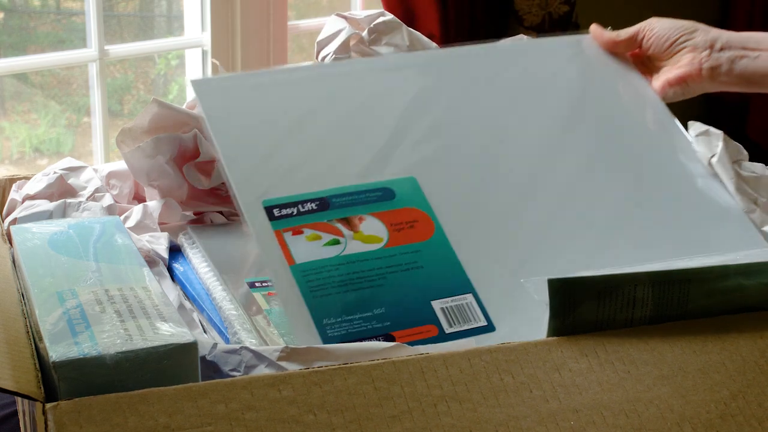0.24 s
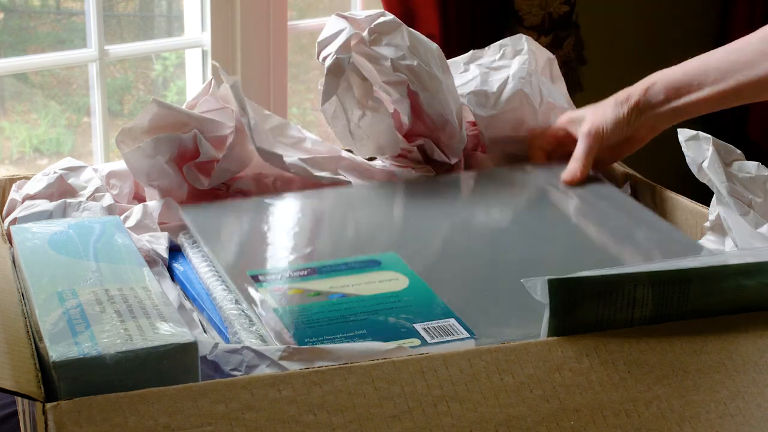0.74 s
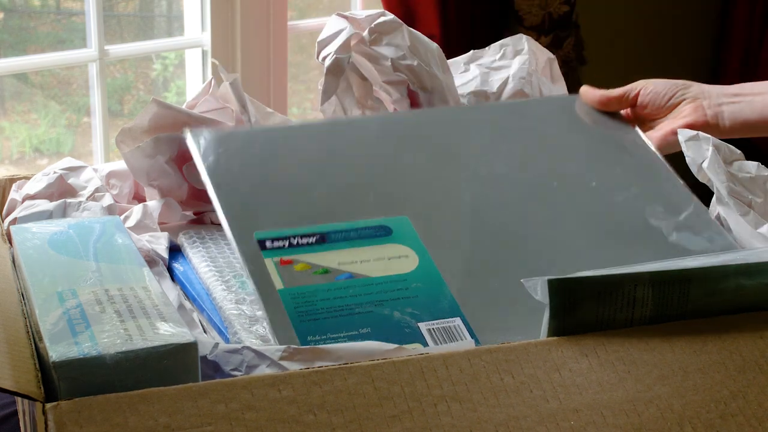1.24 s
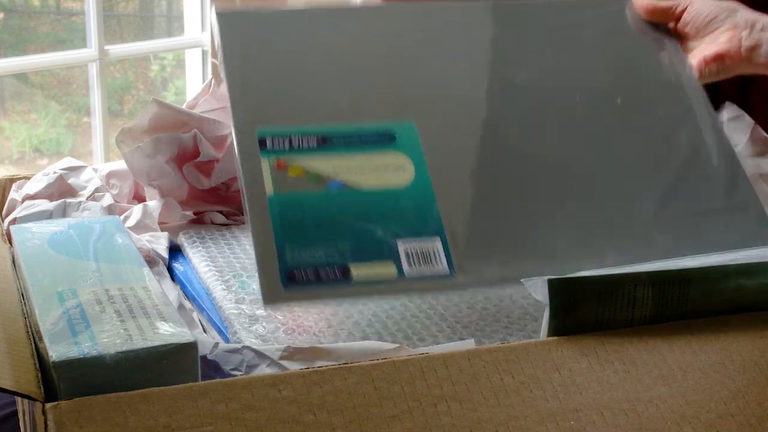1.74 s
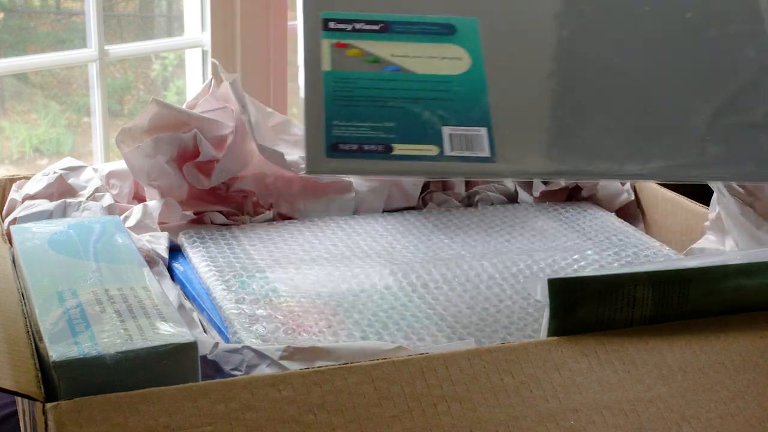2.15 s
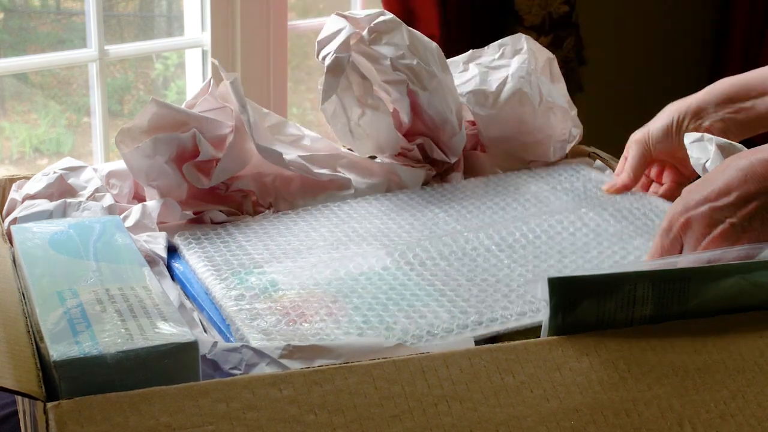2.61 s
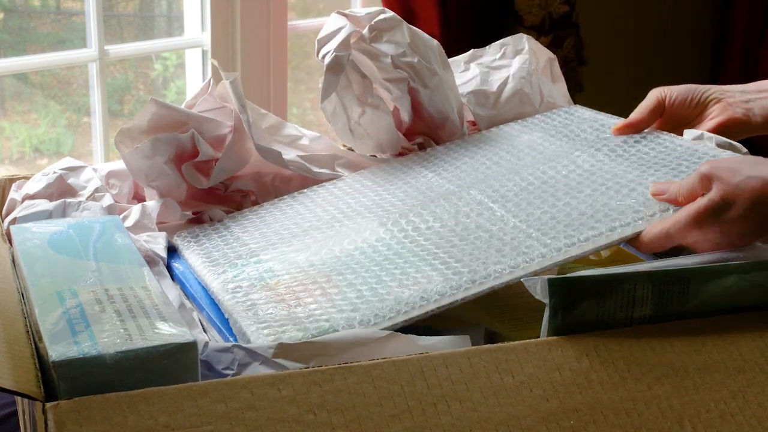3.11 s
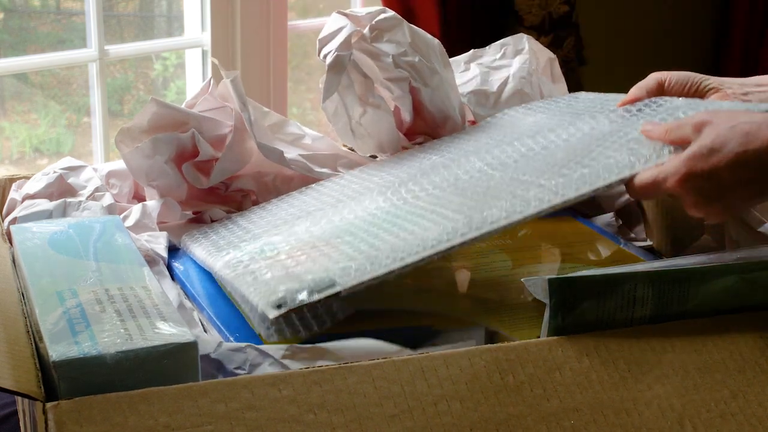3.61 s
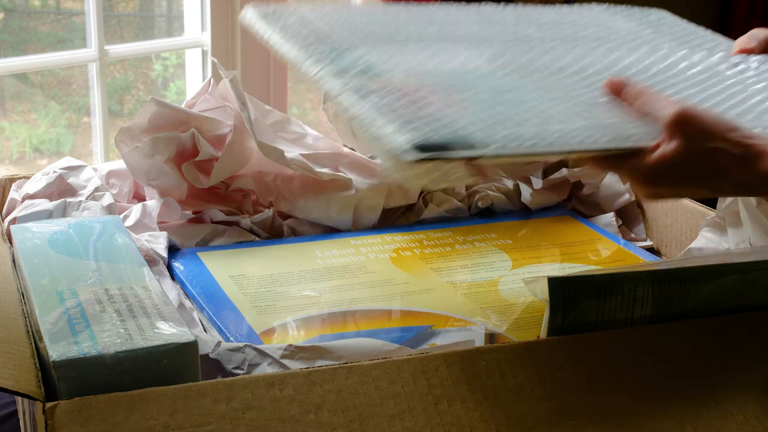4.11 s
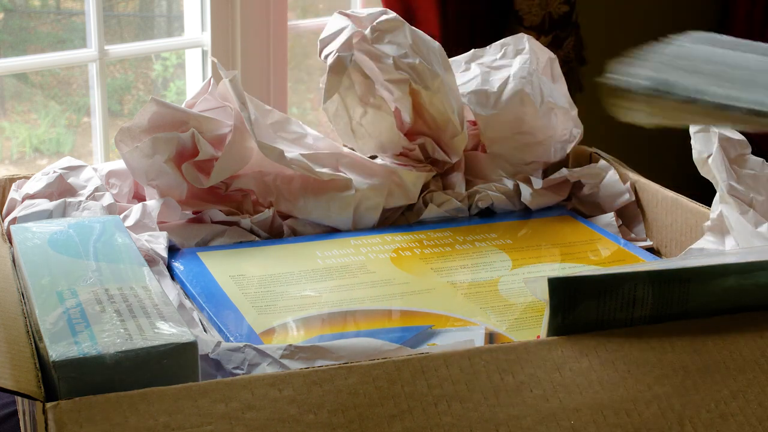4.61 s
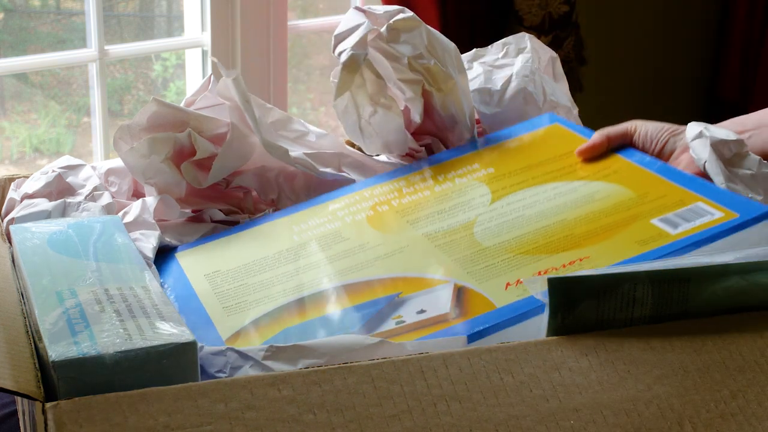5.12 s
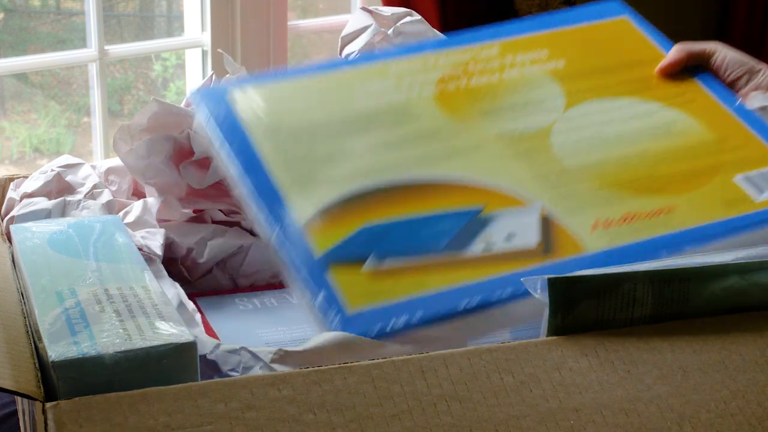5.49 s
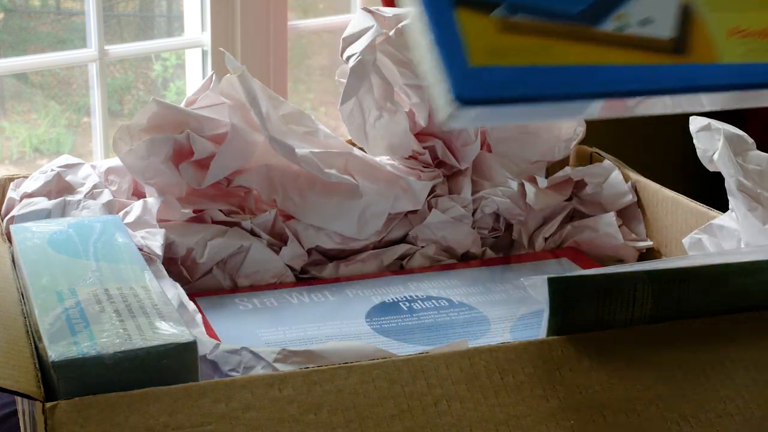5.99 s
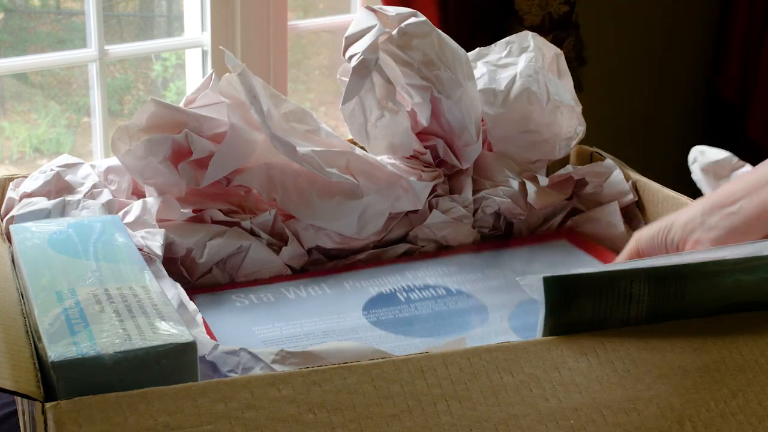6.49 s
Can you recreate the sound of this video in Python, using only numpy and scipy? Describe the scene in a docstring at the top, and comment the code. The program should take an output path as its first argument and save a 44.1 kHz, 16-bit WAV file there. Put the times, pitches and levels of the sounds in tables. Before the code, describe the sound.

Close, irregular bursts of crackling paper, hissing plastic and scraping cardboard as flat packages slide out of a box indoors, ending in a loud rummage.

```python
"""Hissing plastic, crackling paper, snapping creases and knocking edges in a cardboard box in a small room.
Plastic-wrapped boards, a bubble-wrapped sheet and a pad are pulled out past crumpled paper.
Rubbing is coloured noise under trains of tiny random slips; snaps are short ringing noise bursts;
drags are resonances driven by random slips; thumps are damped sines.
Box resonances, diffuse room echoes and a steady hush surround them in stereo."""
import sys
import numpy as np
from scipy import signal
from scipy.fft import rfft, irfft, next_fast_len
from scipy.io import wavfile

SR = 44100
rng = np.random.default_rng(int(sys.argv[2]) if len(sys.argv) > 2 else 0)


def dump_mix(stems):
    """Bounce the given channels to the path in sys.argv[1] as a 16-bit WAV at rate SR."""
    frames = np.atleast_2d(stems).T  # one column per channel
    limited = np.clip(frames, -1, 1)  # hard clip at full scale
    pcm = np.round(limited * 32767).astype(np.int16)
    wavfile.write(sys.argv[1], SR, pcm)


N = 297675
TIME = np.arange(N) / SR
PADDED = next_fast_len(N + SR, True)
FREQS = np.fft.rfftfreq(PADDED, 1 / SR)


def from_db(db):
    """Decibels to gain."""
    return 10 ** (np.asarray(db) / 20)


def rms_one(x):
    """Scale to rms 1."""
    return x / np.sqrt(np.mean(x ** 2) + 1e-20)


def at_hz(points, hz):
    """Read a table on a log-frequency axis."""
    f, value = np.transpose(points)
    return np.interp(np.log(np.maximum(hz, 1)), np.log(f), value)


def colour(x, spectrum):
    """Causal (minimum-phase) filter with the given dB curve."""
    cepstrum = irfft(np.log(from_db(at_hz(spectrum, FREQS))), PADDED)
    cepstrum[1:PADDED // 2] *= 2
    cepstrum[PADDED // 2 + 1:] = 0
    response = np.exp(rfft(cepstrum))
    return irfft(rfft(x, PADDED) * response, PADDED)[..., :N]


def band(x, low_hz, high_hz):
    """Butterworth band-pass."""
    sos = signal.butter(2, [low_hz, high_hz], "band", fs=SR, output="sos")
    return signal.sosfilt(sos, x)


def highpass(x, cutoff_hz):
    """Second-order Butterworth high-pass."""
    return signal.sosfilt(signal.butter(2, cutoff_hz, "high", fs=SR, output="sos"), x)


def boost_peak(x, hz, q, boost_db):
    """Raise or lower one resonance; boost_db may vary in time."""
    b, a = signal.iirpeak(hz, q, fs=SR)
    return x + (from_db(boost_db) - 1) * signal.lfilter(b, a, x)


def drift(per_s):
    """Slow random curve of rms 1, with per_s knots a second."""
    knots = rng.standard_normal(N // 10)
    return rms_one(np.interp(TIME * per_s, np.arange(len(knots)), knots))


def rummaging():
    """Cardboard, paper and plastic rub under the strokes of the hands."""
    card_gain, paper_gain, plastic_gain, sheen, glide = hands()
    # slips come in clumps, which even out in a fast glide
    clumps = from_db(3.0 * (1 - 0.83 * glide) * drift(90))
    return (from_db(-4.5) * card_gain * cardboard_rub(clumps)
            + from_db(-4.0) * paper_gain * paper_rustle(clumps)
            + from_db(0.1) * plastic_gain * plastic_hiss(clumps, sheen, glide))


def hands():
    """Strokes add in power: gains of cardboard, paper and plastic; sheen and glide are means by film power."""
    # hand strokes: first board, second board, bubble-wrapped sheet, pad, then the hand dives back in
    # start/s, swell/s, hold/s, fade/s, then before the mix trims: cardboard/dB, paper/dB, plastic/dB,
    # sheen/dB (top of hiss over its lower part), glide/1 (0 bent and crinkling, 1 flat and fast)
    strokes = [ (0.17, 0.072, .26, 0.077, -56.5, -52.5, -62.5, -2, 0.42),
               (0.36, 0.22, 0.021, 0.087, -60, -50.5, -50, 4.5, 0.79),
               (0.542, 0.05, 0.007, 0.066, -39, -38.5, -52, -14.5, .4),
               (0.71, .003, 0.13, 0.085, -45, -38.5, -39.5, 0, 0.98),
               (0.909, 0.016, 0.038, 0.14, -64, -47, -52, 0, 0.27),
               (1.197, 0.0066, .01, 0.072, -54.5, -58, -59, -12, 0.51),
               (1.305, 0.0046, 0.009, 0.33, -59.5, -59, -60, 7, .3),
               (1.42, 0.23, .14, .1, -60, -55, -57, 0, .3),
               (1.78, 0.053, 0.016, 0.089, -45.5, -50, -50, 2, .3),
               (2.376, 0.01, .08, 0.11, -58, -54.5, -56, 3, 0.27),
               (2.431, 0.079, 0.036, 0.11, -45.5, -41.5, -45.5, 1, .3),
               (2.58, 0.17, 0.028, 0.11, -46, -43, -39.5, 6, 0.49),
               (2.77, 0.031, 0.017, 0.24, -48, -40, -42, 0.5, 0.52),
               (2.85, 0.11, 0.39, 0.5, -68, -51.5, -47, 1, 0.091),
               (3.2, 0.031, 0.012, 0.049, -58, -49, -42.5, 6, .05),
               (3.42, 0.17, 0.01, 0.33, -45, -45, -43.5, -1, 0.2),
               (3.66, 0.17, 0.34, 0.24, -74, -58, -44, 5, 0.79),
               (3.97, 0.039, 0.11, .05, -66, -66, -45, 3.5, 1),
               (4.26, 0.027, 0.059, 0.13, -56.5, -51.5, -45, 0.5, .4),
               (4.42, 0.13, 0.097, 0.11, -82, -63, -52, 3, .05),
               (4.665, 0.025, 0.098, 0.11, -79, -55, -46.5, 0.5, .05),
               (4.993, 0.0059, .28, .1, -49, -47.5, -55.5, 1.5, 0.06),
               (5.25, 0.14, 0.032, 0.17, -40, -40, -42.5, -3.5, .1),
               (5.47, 0.12, 0.076, 0.14, -44.5, -45, -48.5, -0.5, 1),
               (5.68, 0.034, 0.036, 0.13, -48, -42.5, -51, -6, 0.45),
               (5.919, 0.0092, 0.013, 0.11, -55, -39, -48, -16, 0.83),
               (6.178, 0.0066, 0.0064, 0.072, -60, -46, -52.5, -10, 0.46),
               (6.548, 0.002, 0.17, .2, -34.5, -36, -41, -3, .35),
               (6.57, 0.049, 0.013, 0.046, -36, -26, -40, 3, .35)]
    # constant faint floor under the strokes: cardboard/dB, paper/dB, plastic/dB, sheen/dB, glide/1;
    # levels before the mix trims
    constant_floor = (-68.5, -73.5, -73.5, 7, -0.1)
    moves = [(0.99, *constant_floor)] + [(stroke(*row[:4]), *row[4:]) for row in strokes]
    card, paper, plastic, sheen_sum, glide_sum = np.full((5, N), 1e-18)
    for gain, card_db, paper_db, plastic_db, sheen_db, glide in moves:
        film = (gain * from_db(plastic_db)) ** 2
        card += (gain * from_db(card_db)) ** 2
        paper += (gain * from_db(paper_db)) ** 2
        plastic += film
        sheen_sum += film * sheen_db
        glide_sum += film * glide
    sheen = from_db(sheen_sum / plastic)
    return np.sqrt(card), np.sqrt(paper), np.sqrt(plastic), sheen, np.clip(glide_sum / plastic, 0, 1)


def stroke(start_s, swell_s, hold_s, fade_s):
    """Gain of one movement: it gathers speed, holds, then loses 20 dB per fade time."""
    t = TIME - start_s
    swell = np.clip(t / swell_s, 0, 1) ** 1.15
    return swell * from_db(-20 * np.clip((t - swell_s - hold_s) / fade_s, 0, 10))


def cardboard_rub(clumps):
    """Slow slips of board on cardboard, with drifting low resonances; rms 1."""
    # rubbed cardboard colour: f/Hz, relative density/dB
    cardboard = [(40, -43), (75, -31), (120, -8), (220, -2.5), (345, -0.5), (500, 6.5), (720, 1.5),
                 (950, -6), (2000, -32.5)]
    rub = friction(cardboard, slips_per_s=130, spread_db=1.0, slip_s=0.00585, smooth_db=5.0, clumps=clumps)
    return unevenly_coloured(rub, np.geomspace(190, 800, 7), patchy_db=4.0, per_s=21)


def paper_rustle(clumps):
    """Short, uneven slips of crumpled paper, with drifting resonances of its folds; rms 1."""
    # crumpled paper colour: f/Hz, relative density/dB
    paper = [(350, -27), (700, -18.5), (1000, -3), (1800, -2.5), (2700, -1.5), (3500, -13), (6000, -23),
             (12000, -57)]
    rustle = friction(paper, slips_per_s=260, spread_db=3.8, slip_s=.0014, smooth_db=-4, clumps=clumps)
    return unevenly_coloured(rustle, np.geomspace(900, 3300, 8), patchy_db=2.5, per_s=45)


def plastic_hiss(clumps, sheen, glide):
    """Dense tiny slips hiss in two ranges; bent film adds pops, gliding film a finer hiss."""
    # lower film hiss: f/Hz, relative density/dB
    plastic_low = [(1500, -26), (2800, -2.5), (3700, -0.5), (4500, 1), (6200, -2), (8000, -6.5),
                   (13000, -41)]
    # upper film hiss: f/Hz, relative density/dB
    plastic_top = [(4000, -33.5), (6500, -8.5), (8000, -0.5), (9800, 2.5), (11200, -2.5), (12500, -4.5),
                   (14500, -11.5), (16000, -21)]
    # finest hiss, film gliding on film: f/Hz, relative density/dB
    glide_hiss = [(7000, -25), (10500, -6.5), (12000, 1), (14500, -9), (16000, -11)]
    low = friction(plastic_low, slips_per_s=940, spread_db=0.0, slip_s=0.00065, smooth_db=5.5, clumps=clumps)
    top = friction(plastic_top, slips_per_s=990, spread_db=-0.5, slip_s=0.00073, smooth_db=-2.5, clumps=clumps)
    rubbing = (low + sheen * top) / np.sqrt(1 + sheen ** 2)
    popping = from_db(-5) * (1 - glide) * pops(per_s=100, spread_db=4.6, cycles=1.5)
    fine_hiss = rms_one(colour(rng.standard_normal(N), glide_hiss))
    return rubbing + popping + from_db(-6.5) * glide ** 2 * fine_hiss


def friction(spectrum, slips_per_s, spread_db, slip_s, smooth_db, clumps):
    """Tiny slips of uneven size, each a short puff, over a smooth rubbing noise; rms 1."""
    born = rng.random(N) < slips_per_s * clumps / SR
    sizes = from_db(spread_db * np.minimum(rng.exponential(1, N), 4))
    decay = np.exp(-2 / (slip_s * SR))   # of power
    power = signal.lfilter([1], [1, -decay], born * sizes ** 2 + 1e-18)
    envelope = np.sqrt(power / power.mean() + from_db(smooth_db) ** 2 * clumps)
    return rms_one(colour(envelope * rng.standard_normal(N), spectrum))


def unevenly_coloured(x, centres_hz, patchy_db, per_s):
    """Each moment other folds vibrate, so narrow resonances swell and fade; rms 1."""
    for hz in centres_hz:
        x = boost_peak(x, hz, 7, patchy_db * drift(per_s))
    return rms_one(x)


def pops(per_s, spread_db, cycles):
    """Tiny creases in the film let go at random, each ringing briefly at one of 16 pitches; rms 1."""
    pitches_hz = np.geomspace(2200, 12000, 16)
    born = rng.random(N) < per_s * from_db(4.0 * drift(15)) / SR
    sizes = from_db(spread_db * np.minimum(rng.exponential(1, N), 2.5))
    clicks = born * sizes * rng.choice([-1, 1], N)
    dealt = rng.integers(0, len(pitches_hz), N)
    out = np.zeros(N)
    for k, hz in enumerate(pitches_hz):
        radius = np.exp(-hz / (cycles * SR))
        angle = 2 * np.pi * hz / SR
        poles = [1, -2 * radius * np.cos(angle), radius * radius]
        out += signal.lfilter([1, 0, -1], poles, clicks * (dealt == k) + 1e-18) * np.sqrt(hz)
    return rms_one(out)


def flicks():
    """Taut film flicks: mostly the top ranges sound."""
    # film flicks: t/s, base level/dB, base decay/s, ring f/Hz, tilt/(dB/octave)
    events = [(.0166, -53, .0012, 7600, -5), (.5675, -43.5, 0.0073, 2900, 4),
              (.7537, -21.5, 0.00068, 11300, 1.5), (.9308, -31, 0.00096, 12500, 10),
              (1.3105, -42.5, 0.0012, 7500, -5.5), (1.5868, -49, .0009, 12400, 8),
              (1.6492, -46.5, 0.0062, 9300, -4), (1.8074, -40, .005, 9050, 8),
              (2.481, -48, 0.0017, 2420, -8), (2.9705, -41.5, .0046, 9600, 10),
              (3.1644, -41.5, 0.00044, 6510, 10), (3.2408, -45, 0.0022, 9430, -4.5),
              (3.6565, -40.5, 0.00078, 9200, 5), (4.2267, -52.5, .0006, 9430, -8.5),
              (4.344, -41, .002, 9430, 9), (4.6816, -45, 0.0011, 8970, -6),
              (5.2751, -35.5, .0018, 9100, -3), (5.388, -24, 0.0016, 8640, -1),
              (6.6128, -30, .0012, 5000, -5), (6.6808, -34.5, 0.002, 7800, 3)]
    # relative range levels: body/dB, crack/dB, tick/dB, sizzle/dB
    ranges_db = (-31, -15, -8.5, 1.5)
    return snaps(events, ranges_db, ring_db=12)


def creases():
    """Creases buckle with a strongly ringing snap."""
    # buckling creases: t/s, base level/dB, base decay/s, ring f/Hz, tilt/(dB/octave)
    events = [(.971, -35.5, 0.0038, 3650, -2), (.9942, -38.5, .0024, 3670, 1.5),
              (1.0307, -39, 0.0022, 2680, 6.5), (1.5014, -42, 0.0005, 3950, -1),
              (1.6822, -43, .0009, 3800, 3.5), (3.7856, -47, 0.00061, 6050, -2),
              (3.8967, -34, 0.002, 4270, 1.5), (4.615, -42.5, .0019, 4140, 4),
              (4.7772, -39.5, 0.0043, 2150, 0.5), (5.2376, -37.5, 0.00079, 2250, -0.5),
              (5.4913, -37, 0.0072, 2280, 0), (6.69, -37.5, 0.0017, 5450, -5.5)]
    # relative range levels: body/dB, crack/dB, tick/dB, sizzle/dB
    ranges_db = (-25, -5.5, -1.5, -4.5)
    return snaps(events, ranges_db, ring_db=16.5)


def taps():
    """A board's edge taps its neighbour or the paper: mostly the crack range."""
    # edge taps: t/s, base level/dB, base decay/s, ring f/Hz, tilt/(dB/octave)
    events = [(.2066, -54, .003, 2710, 4), (.237, -44, 0.013, 1900, 0), (.7512, -25, 0.0013, 2320, -1),
              (.7537, -24, 0.0013, 1140, -2.5), (.7829, -42, 0.00077, 2200, -8),
              (.8523, -37.5, .0005, 1060, 3.5), (.8928, -36, 0.0032, 1010, 2),
              (.924, -42, 0.00097, 2450, 4), (.9392, -40, 0.0021, 1020, 2.5),
              (1.2075, -41, 0.0031, 1440, -0.5), (1.8214, -39, 0.0013, 495, 1.5),
              (2.379, -46, 0.0081, 1440, 3.5), (2.4976, -37, 0.0015, 3160, 2.5),
              (2.5515, -43, 0.00061, 1850, -7), (2.7107, -34.5, 0.00019, 1730, -5.5),
              (2.8105, -28.5, .0013, 1440, 0), (2.8344, -36, 0.0011, 2670, -4.5),
              (3.445, -39.5, 0.0035, 2380, -1.5), (3.4744, -39.5, 0.002, 2440, -1),
              (3.5747, -30, 0.006, 2560, 3), (4.1938, -39, 0.0073, 1070, .5), (4.2996, -38, 0.005, 1470, 3),
              (5.183, -44, 0.0013, 2300, -7), (5.192, -42, .003, 1510, -5.5),
              (5.3909, -29, 0.0034, 1560, -7), (5.425, -35, 0.00065, 2420, -6.5),
              (5.7052, -33.5, 0.0073, 2330, 1), (5.9255, -29.5, 0.0026, 1950, 2.5),
              (6.1855, -48.5, 0.01, 1810, 3), (6.2927, -46, 0.0034, 1480, -5.5),
              (6.443, -51.5, 0.015, 1400, 2.5), (6.5499, -31, .003, 960, 1.5),
              (6.5884, -26.5, 0.0063, 1770, -1), (6.6128, -34, 0.0014, 1300, -2),
              (6.6253, -25.5, 0.0067, 2620, -3), (6.6419, -44, .0013, 970, 8.5)]
    # relative range levels: body/dB, crack/dB, tick/dB, sizzle/dB
    ranges_db = (-13.5, -2, -10.5, -12)
    return snaps(events, ranges_db, ring_db=9)


def knocks():
    """Something bumps the cardboard wall: mostly the body range."""
    # wall bumps: t/s, base level/dB, base decay/s, ring f/Hz, tilt/(dB/octave)
    events = [(1.769, -41.5, 0.0028, 527, 2.5), (1.8339, -40, 0.0023, 600, 6.5),
              (2.5283, -33.5, 0.0055, 420, -1.5), (2.6732, -40.5, 0.0019, 452, 2.5),
              (3.639, -35, 0.0037, 644, 2), (4.303, -48.5, .004, 256, 6), (5.0023, -43, 0.011, 970, 3.5),
              (5.1262, -36, 0.0015, 684, -16), (5.3538, -35, 0.005, 510, -.5),
              (5.5201, -38, 0.0029, 544, 3.5)]
    # relative range levels: body/dB, crack/dB, tick/dB, sizzle/dB
    ranges_db = (0, -10, -22, -24)
    return snaps(events, ranges_db, ring_db=13)


def snaps(events, ranges_db, ring_db):
    """Noise bursts die within milliseconds, each range at its own rate, and ring the fold or edge."""
    # frequency ranges of a snap: low f/Hz, high f/Hz, decay factor/1
    snap_ranges = [(250, 1100, 1.4), (825, 3300, 1.97), (3400, 5360, 1.37), (6400, 12200, 1.1)]
    span_s = .0045   # a range's level is its rms over this span
    out, t = np.zeros(N + SR), TIME[:SR // 10]
    attack = 1 - np.exp(-t / 0.000088)
    octaves = np.log2([low_hz * high_hz for low_hz, high_hz, _ in snap_ranges]) / 2
    octaves = octaves - octaves[np.argmax(ranges_db)]   # tilt pivots on the strongest range
    for start_s, snap_db, decay_s, ring_hz, tilt_db in events:
        at = int(start_s * SR)
        levels_db = snap_db + np.array(ranges_db) + tilt_db * octaves
        for (low_hz, high_hz, linger), level_db in zip(snap_ranges, levels_db):
            envelope = np.exp(-t / (decay_s * linger)) * attack
            burst = band(rng.standard_normal(len(t)) * envelope, low_hz, high_hz)
            burst = boost_peak(burst, ring_hz, 5.5, ring_db)
            out[at:at + len(t)] += from_db(level_db) * burst * np.sqrt(span_s * SR / np.sum(burst ** 2))
    # light folds and edges radiate little bass
    return highpass(out[:N], 150)


def drags():
    """Uneven stick and slip keeps one resonance of a sliding board going; it swells and fades with the pull."""
    # singing dragged edges: start/s, end/s, f/Hz, width/Hz, level before pull and flutter/dB
    table = [(0.161, 0.32, 2830, 600, -59.5), (0.314, 0.622, 2670, 900, -61),
             (2.662, 2.895, 542, 89.5, -51), (3.433, 3.545, 2420, 300, -51), (3.947, 4.287, 2380, 400, -58),
             (5.088, 5.152, 212, 69.5, -50.5), (5.108, 5.277, 693, 120, -53.5),
             (6.56, 6.79, 940, 240, -43.5)]
    out = np.zeros(N)
    for start_s, end_s, hz, width_hz, level_db in table:
        progress = np.clip((TIME - start_s) / (end_s - start_s), 0, 1)
        pull = np.abs(np.sin(np.pi * progress)) ** 0.66
        slips = (rng.random(N) < 450 / SR) * rng.standard_normal(N) + 1e-18
        tone = rms_one(band(slips, hz - width_hz / 2, hz + width_hz / 2))
        out += from_db(level_db + 2.64 * drift(50)) * pull * tone
    return out


def thumps():
    """A push gives the whole box one dull, heavily damped swing."""
    # box shifts under a push: t/s, sine amplitude before damping/dB
    table = [(.711, -61), (.756, -62), (.945, -65), (3.578, -66), (5.0, -48), (5.39, -58), (6.551, -52)]
    t = TIME[:SR // 8]
    swing = np.sin(2 * np.pi * 62 * t) * np.exp(-t / 0.002)
    pushes = np.zeros(N)
    for start_s, level_db in table:
        pushes[int(start_s * SR)] = from_db(level_db)
    return signal.fftconvolve(pushes, swing)[:N]


def box(x):
    """The open box shapes the sound with its resonances, most of them raised."""
    # box resonances: f/Hz, width/Hz, boost/dB
    modes = [(286, 18.6, 2), (530, 6.8, 2), (1058, 12, 3.5), (1440, 154, 2.5), (1865, 89, 4),
             (2515, 130, 1.5), (4200, 240, -1.5)]
    for hz, width_hz, boost_db in modes:
        x = boost_peak(x, hz, hz / width_hz, boost_db)
    return x


def microphones(near, wet_db):
    """Near sound reaches the two close capsules almost alike; the room's tail and hush differ more."""
    # room decay: f/Hz, t60/s
    room_t60 = [(150, 0.377), (600, 0.46), (2500, 0.41), (6000, 0.3), (15000, 0.13)]
    # stereo side colour before the side trims: f/Hz, level/dB
    width = [(50, -23), (130, -43), (300, -34), (500, -23.5), (1200, -14.5), (2200, -14.5), (5200, -14),
             (6800, -19), (8000, -35), (9300, -43), (10500, -15), (13000, -10), (16000, -4)]
    mid = near + from_db(wet_db) * scattered(near, room_t60) + still_air()
    diffuse = from_db(wet_db) * scattered(near, room_t60) + still_air()
    nearby = scattered(near, [(150, .05), (15000, 0.019)])
    side = colour(from_db(-2.5) * nearby + from_db(8.5) * diffuse, width)
    # right capsule 0.2 dB hotter than left
    return np.array([mid + side, mid - side]) * from_db([[-.1], [.1]])


def scattered(x, t60_table):
    """Diffuse echoes die octave by octave; as hands and boards move, the pattern changes every 0.2 s."""
    t, edges_hz = TIME[:SR // 2], np.geomspace(70, 17920, 9)
    starts = range(0, N, SR // 5)
    tails = np.zeros((len(starts), len(t)))
    for low_hz, high_hz in zip(edges_hz, edges_hz[1:]):
        dying = from_db(-60 * t / at_hz(t60_table, np.sqrt(low_hz * high_hz)))
        tails += band(rng.standard_normal(tails.shape), low_hz, high_hz) * dying
    tails = tails * (1 - np.exp(-t / 0.00064))
    out = np.zeros(N + SR)
    for at, tail in zip(starts, tails):
        echo = signal.fftconvolve(x[at:at + starts.step], tail / np.sqrt(np.sum(tail ** 2)))
        out[at:at + len(echo)] += echo
    return out[:N]


def still_air():
    """Steady coloured noise: room hush and microphone hiss."""
    # hush colour: f/Hz, relative density/dB
    air = [(24, -80.5), (40, -69), (109, -2.5), (220, -6), (256, -5), (363, -5.5), (467, -9), (503, -3.5),
           (556, -11), (810, -12), (1120, -10.5), (1240, -10.5), (1680, -14), (9220, -18.5), (16000, -27)]
    return from_db(-64) * rms_one(colour(rng.standard_normal(N), air))


def scene():
    """The handling sounds in box and room."""
    contacts = flicks() + creases() + taps() + knocks()
    handling = rummaging() + drags() + contacts + thumps()
    return microphones(box(handling), wet_db=-10.5)


def record(dry):
    """The microphone loses the deep bass; the top is cut steeply at 16 kHz."""
    lean = highpass(dry, 55)
    return signal.sosfilt(signal.ellip(10, .2, 80, 16000, fs=SR, output="sos"), lean)


dry = scene()
out = record(dry)
dump_mix(out)
```